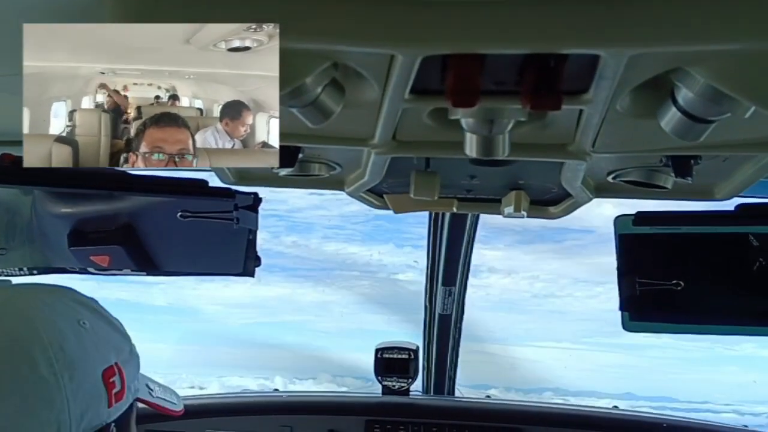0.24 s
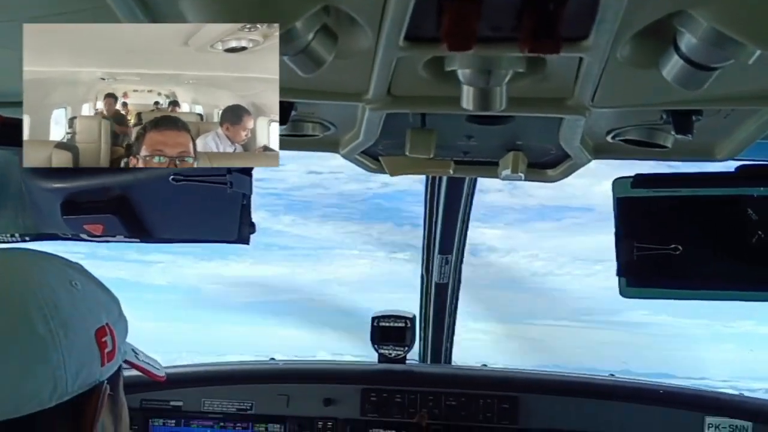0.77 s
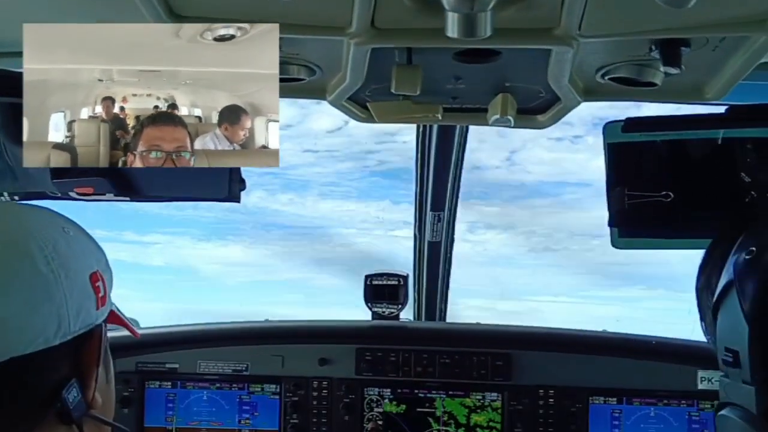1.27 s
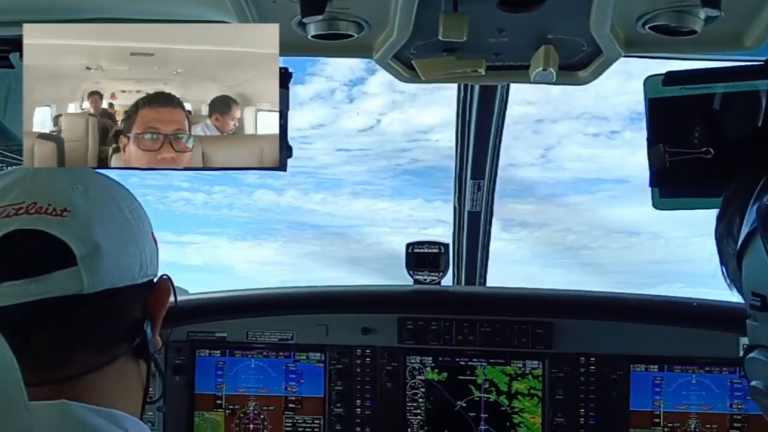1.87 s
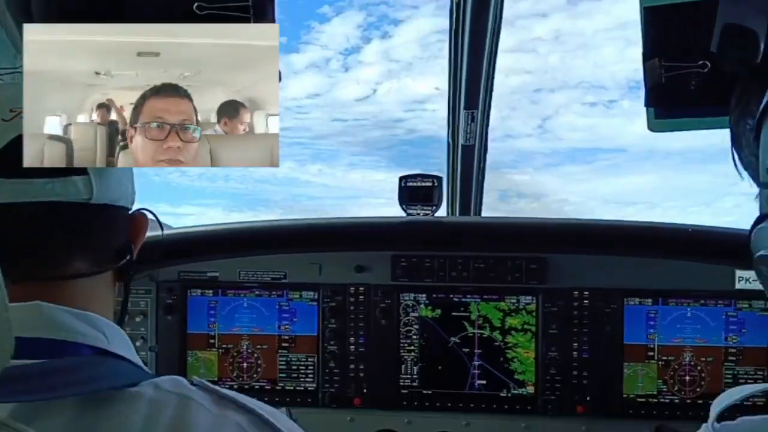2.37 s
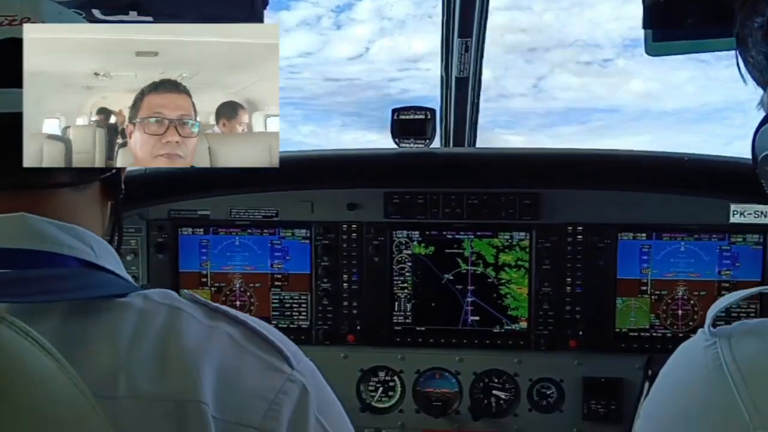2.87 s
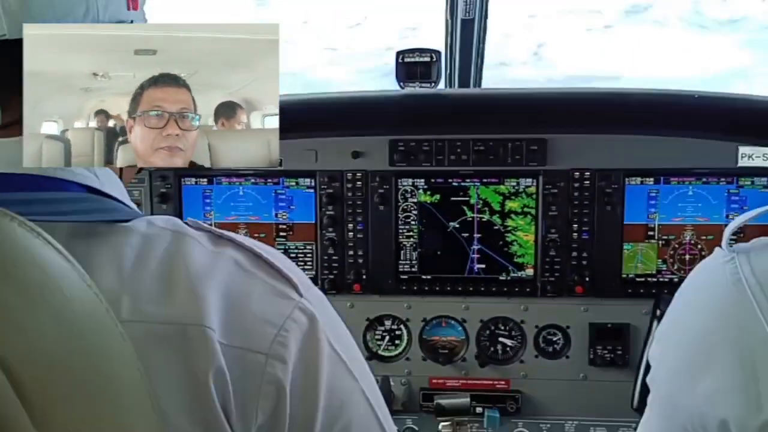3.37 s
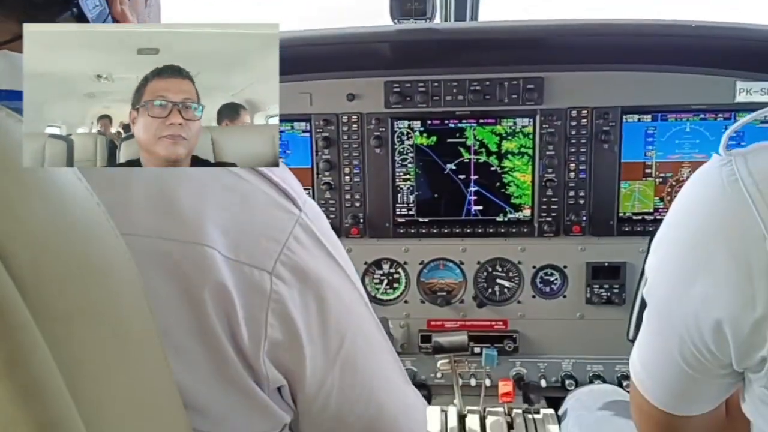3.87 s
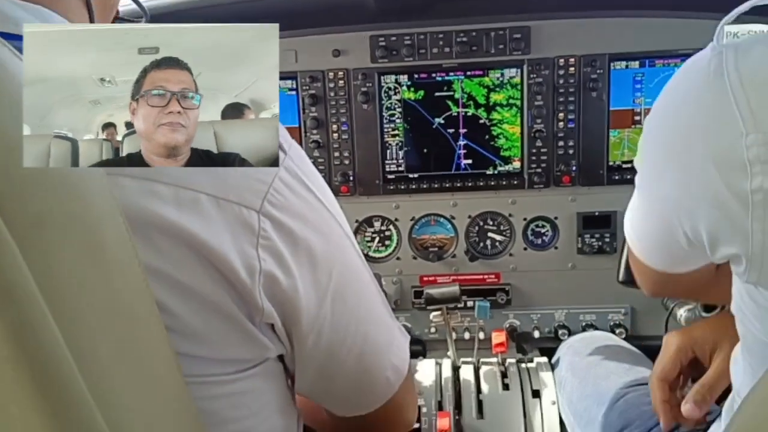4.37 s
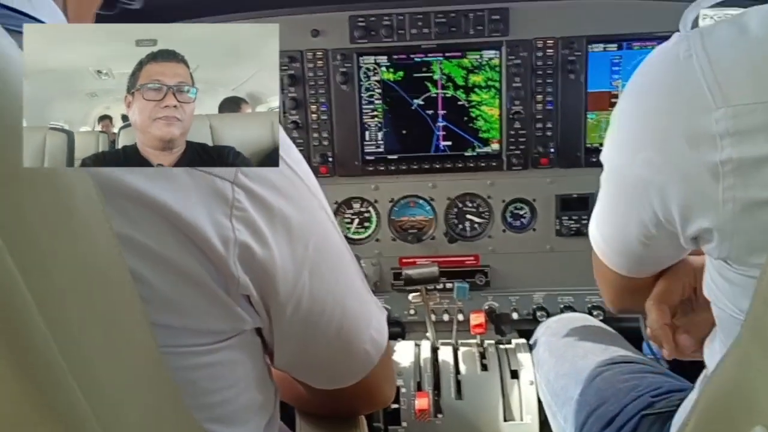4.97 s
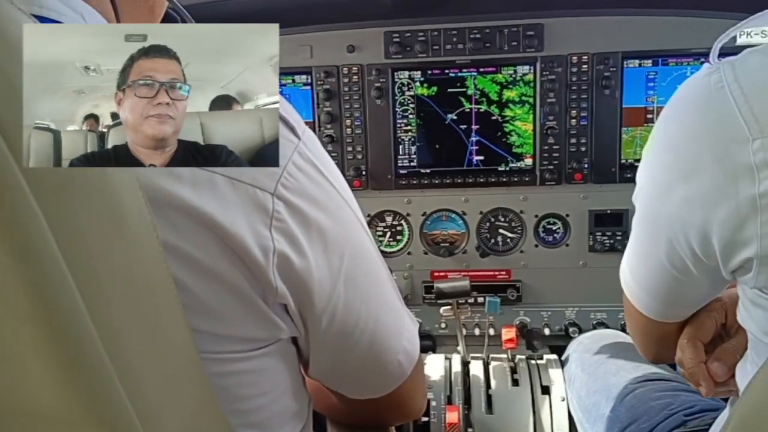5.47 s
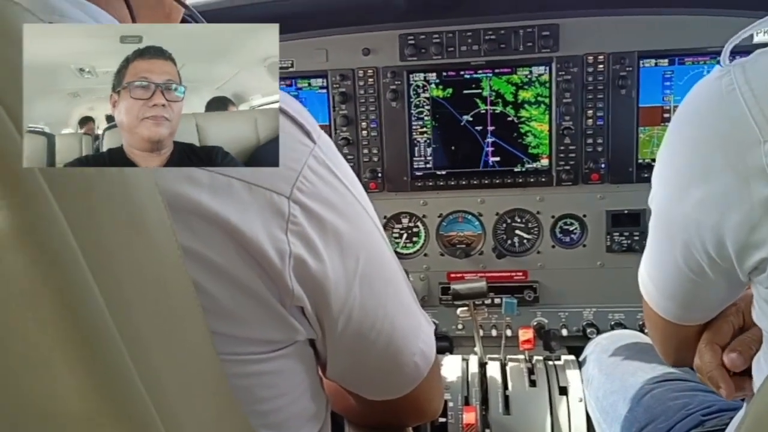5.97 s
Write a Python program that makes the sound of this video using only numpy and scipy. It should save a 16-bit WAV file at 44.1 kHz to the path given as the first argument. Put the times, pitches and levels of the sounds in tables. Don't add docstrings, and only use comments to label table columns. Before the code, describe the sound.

A continuous, loud cabin drone from a small propeller aircraft: low humming blade tone with buzzing overtones, broad muffled wind roar, and fluttering airy hiss. Far up in pitch a faint turbine whistle comes briefly near one second, drops away, then is clearest around four seconds before receding. Close, enclosed space, hand-held microphone slightly saturated and thin in the deepest bass. No separate events from the cockpit.

```python
import sys
import numpy as np
from scipy import signal
from scipy.fft import rfft, irfft, next_fast_len
from scipy.io import wavfile
from scipy.ndimage import uniform_filter1d, map_coordinates

SR = 44100
rng = np.random.default_rng(int(sys.argv[2]) if len(sys.argv) > 2 else 0)


def wav_record(signal):
    frames = np.transpose(np.atleast_2d(signal))
    bounded = np.clip(frames, -1, 1)
    quanta = np.round(bounded * 32767).astype(np.int16)
    wavfile.write(sys.argv[1], SR, quanta)


def linear_from_db(decibels):
    return 10 ** (np.asarray(decibels, float) / 20)


N = 274743


def unit(x):
    return x / np.sqrt(np.mean(x ** 2) + 1e-20)


def wobble(rate):
    knots = rng.standard_normal(int(N * rate / SR) + 4)
    return map_coordinates(knots, [np.arange(N) * rate / SR])


def filtered(x, response):
    m = next_fast_len(N + SR // 2)
    return irfft(rfft(x, m) * response(np.fft.rfftfreq(m, 1 / SR)), m)[:N]


def rush(spectrum, patchy_db):
    cells = signal.stft(rng.standard_normal(N + 512), nperseg=512)[2]
    patches = uniform_filter1d(rng.standard_normal(cells.shape), size=10, axis=0)
    patches = uniform_filter1d(patches, size=3, axis=1)
    noise = signal.istft(cells * linear_from_db(patchy_db * unit(patches)), nperseg=512)[1][:N]
    f, db = np.transpose(spectrum)

    def colour(hz):
        return linear_from_db(np.interp(np.log(hz + 1), np.log(f), db, -120, -120))

    return unit(filtered(noise, colour))


def saturate(x, top, knee):
    return x / (1 + np.abs(x / top) ** knee) ** (1 / knee)


def propeller():
    # multiple of the shaft rate [1], level/dB rms
    orders = [(4, -16.5), (5, -36.5), (8, -23), (12, -33.5), (16, -39.5), (20, -44.5), (24, -45),
              (27, -48.5), (32, -51.5), (44, -78), (48, -65), (50, -54.5)]
    shaft_hz = 31.6
    sweep, sway, flutter_db = 0.72, 0.02, 0.6
    turn = 2 * np.pi * shaft_hz * np.arange(N) / SR + sway * wobble(2.14)
    tones = np.zeros(N)
    for k, db in orders:
        blade = k / 4
        lag = sweep * blade * (blade - 1)
        level = linear_from_db(db + flutter_db * wobble(2.93))
        tones += level * np.sqrt(2) * np.cos(k * turn - lag)
    return tones


def airflow(gust, aim_db):
    # f/Hz, level/dB per Hz
    buffet_spectrum = [(8, -30), (20, -29), (38, -10), (50, -1.5), (70, 7.5), (95, 2.5), (115, -34),
                       (200, -44.5)]
    # f/Hz, level/dB per Hz
    skin_spectrum = [(60, -24), (110, 4), (160, 0.5), (185, -2), (240, 0.5), (310, -1), (370, -10),
                     (450, -7), (700, -12.5), (1000, -16), (1500, -22.5), (2000, -28), (2800, -41),
                     (5000, -76)]
    # f/Hz, level/dB per Hz
    vent_spectrum = [(1000, -3.5), (2700, 3.5), (5000, 4), (6600, 3), (7000, -3.5), (8300, -14),
                     (11000, -16), (13000, -11), (16000, -12)]
    buffet = linear_from_db(-23 + 0.072 * aim_db) * rush(buffet_spectrum, patchy_db=2)
    roar = linear_from_db(-20.5 + 0.15 * gust) * rush(skin_spectrum, patchy_db=0)
    vent = linear_from_db(-44.6 + 0.66 * gust) * rush(vent_spectrum, patchy_db=1.14)
    return buffet + roar + vent


def turbine(gust, aim_db):
    # f/Hz, level/dB per Hz
    intake_spectrum = [(5180, -42), (8800, -7), (9240, -2.5), (9500, 0), (9810, 8), (10200, 0.5),
                       (10600, -5), (10900, -8), (14200, -39), (22000, -120)]
    # f/Hz, level/dB per Hz
    port_spectrum = [(12500, -30), (13850, -17), (14000, -11), (14400, -3.5), (14680, 0), (14950, -4),
                     (15150, -5), (15450, -11), (16000, -20)]
    whine_hz, gear_hz = 9799.4, 3003
    t = np.arange(N) / SR
    whine = np.sqrt(2) * np.cos(2 * np.pi * whine_hz * t + 0.73 * wobble(6.1))
    whine *= linear_from_db(-62 + aim_db + 2.5 * wobble(20))
    gear = linear_from_db(-66) * np.sqrt(2) * np.cos(2 * np.pi * gear_hz * t + 1.5 * wobble(15))
    intake_db = -55.5 + 0.15 * aim_db + 0.53 * gust + 0.7 * wobble(35)
    intake = linear_from_db(intake_db) * rush(intake_spectrum, patchy_db=2.0)
    port_db = -49 + 0.5 * gust + 0.6 * wobble(35)
    port = linear_from_db(port_db) * rush(port_spectrum, patchy_db=0.8)
    return whine + gear + intake + port


def scene():
    # t/s, exposure level/dB
    aim = [
        (0, -4),
        (1.05, 2),
        (1.5, -6),
        (2.6, -5),
        (2.95, 4),
        (3.5, 2),
        (3.9, 5),
        (4.55, 4),
        (4.95, -2),
        (6.23, -5),
    ]
    seconds, exposure_db = np.transpose(aim)
    aim_db = np.interp(np.arange(N) / SR, seconds, exposure_db)
    gust = wobble(30)
    return (propeller() + airflow(gust, aim_db) + turbine(gust, aim_db))[None]


def low_pass(x):
    return signal.sosfilt(signal.butter(12, 16680, fs=SR, output="sos"), x)


def record(dry):
    # f/Hz, level/dB per Hz
    hiss_spectrum = [(2000, 9), (6500, 6.5), (7500, 4.5), (9000, -4), (12000, 7.5), (15000, 5)]
    x = saturate(dry[0] + 0.045, top=0.37, knee=5)
    cut_hz, damping = 150, 1.41
    x = filtered(x - x.mean(), lambda f: -f * f / (cut_hz ** 2 - f * f + 1j * damping * cut_hz * f))
    shake_hz = 26.4
    shake = np.sqrt(2) * np.sin(2 * np.pi * shake_hz * np.arange(N) / SR)
    shake *= linear_from_db(-52.5 + 1.6 * wobble(6))
    x = saturate(linear_from_db(2.5) * x + shake, top=0.55, knee=2.9)
    hiss = linear_from_db(-53.5) * rush(hiss_spectrum, patchy_db=0.8)
    top_hz = 15480
    x = filtered(x + hiss, lambda f: f < top_hz)
    return low_pass(x[None])


dry = scene()
out = record(dry)
wav_record(out)
```